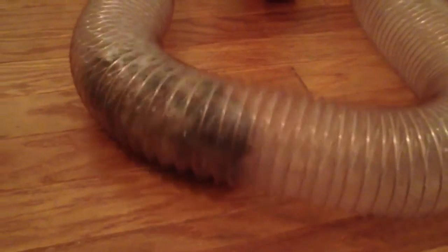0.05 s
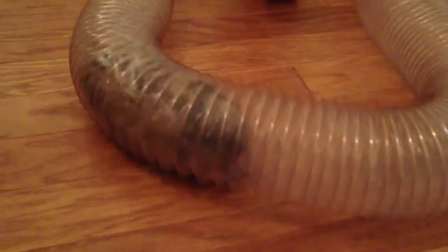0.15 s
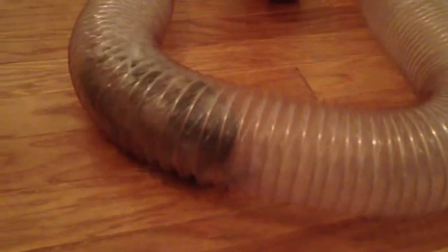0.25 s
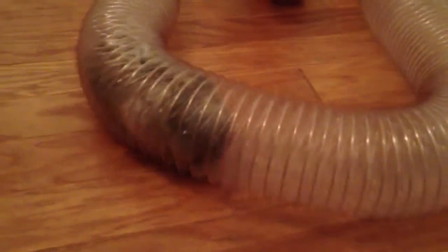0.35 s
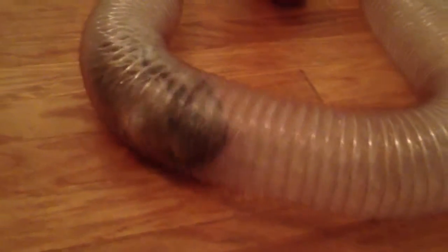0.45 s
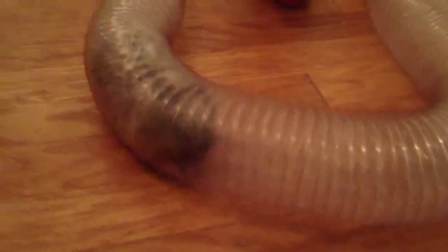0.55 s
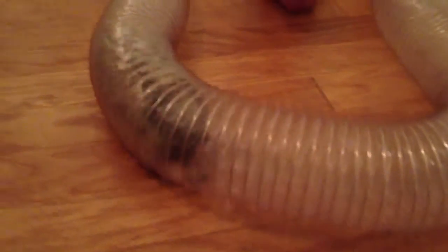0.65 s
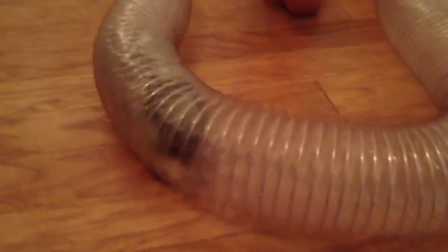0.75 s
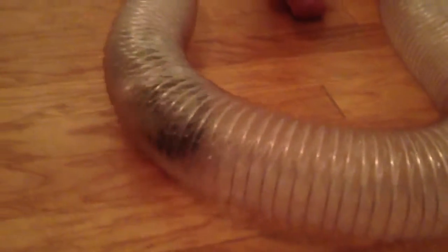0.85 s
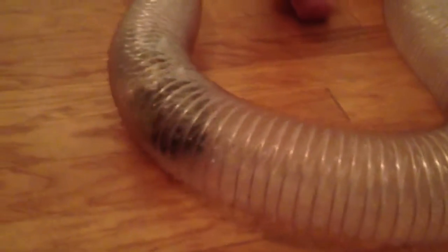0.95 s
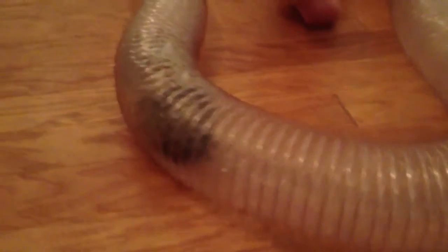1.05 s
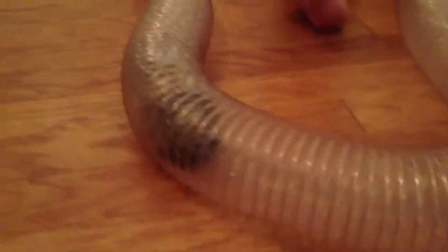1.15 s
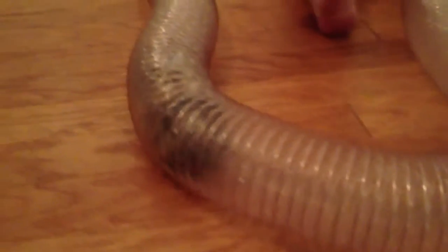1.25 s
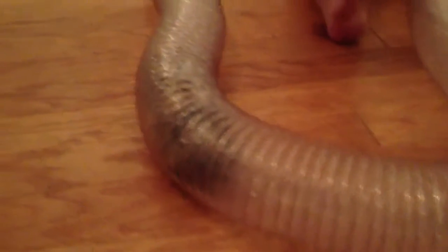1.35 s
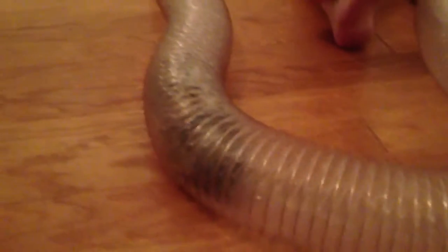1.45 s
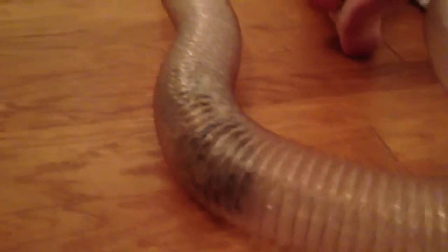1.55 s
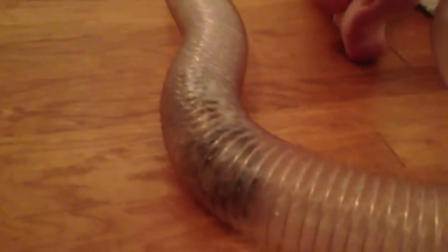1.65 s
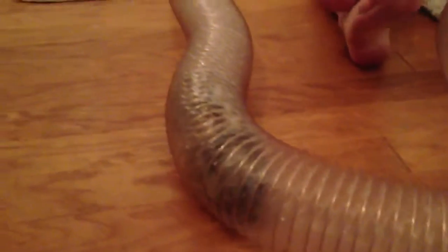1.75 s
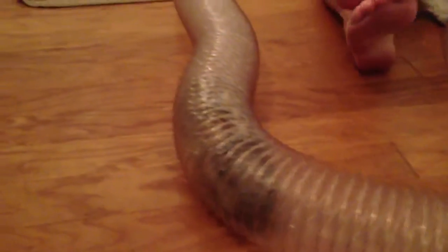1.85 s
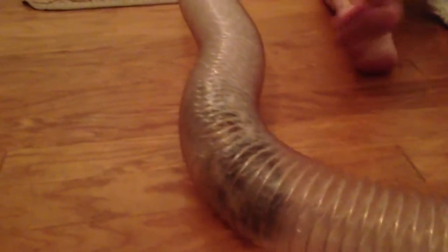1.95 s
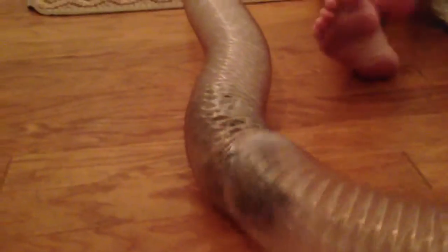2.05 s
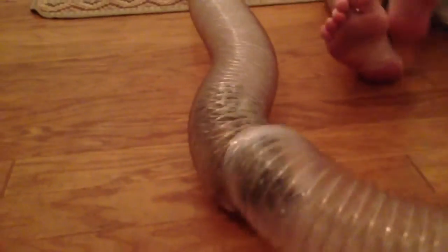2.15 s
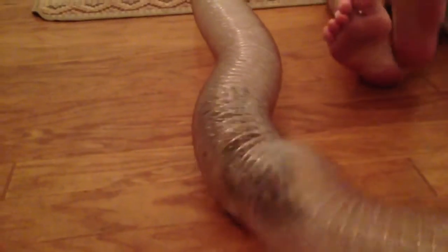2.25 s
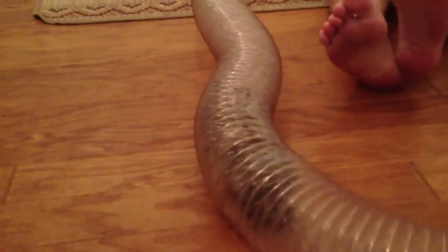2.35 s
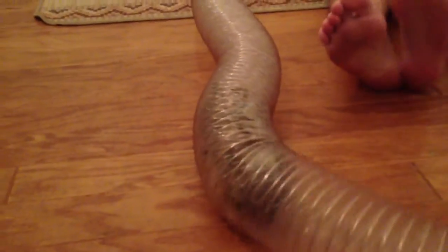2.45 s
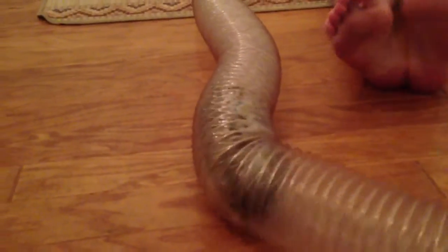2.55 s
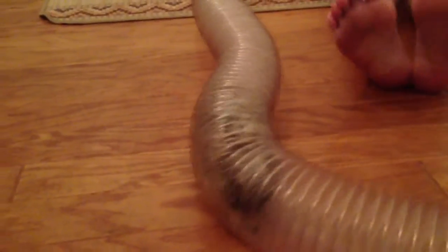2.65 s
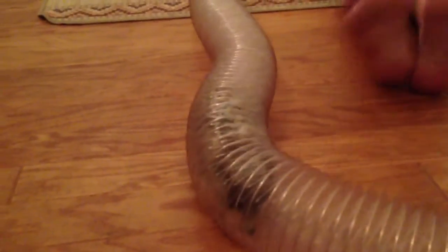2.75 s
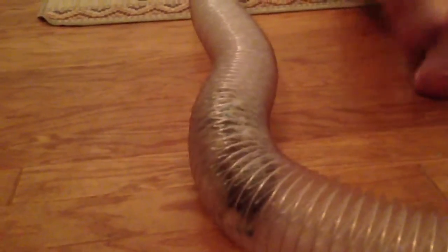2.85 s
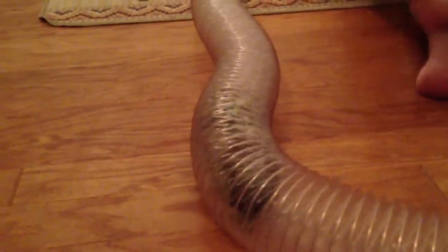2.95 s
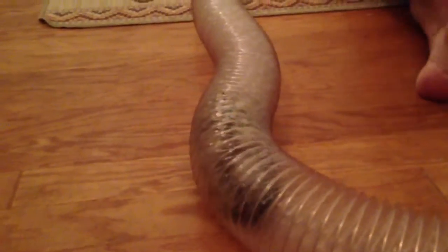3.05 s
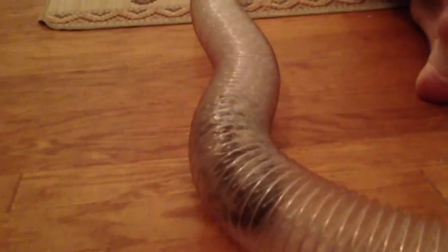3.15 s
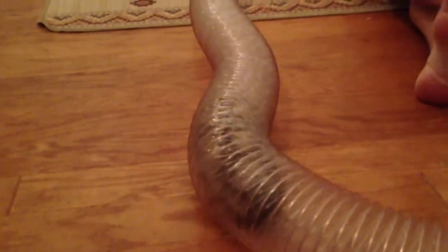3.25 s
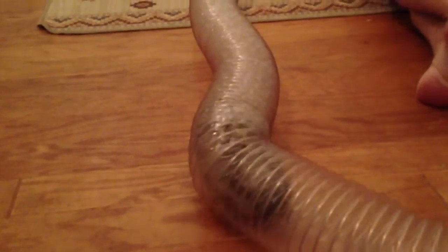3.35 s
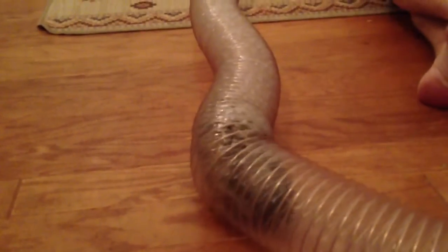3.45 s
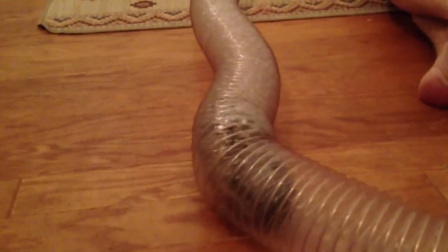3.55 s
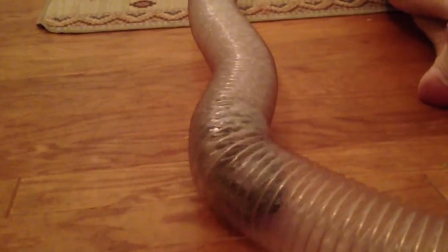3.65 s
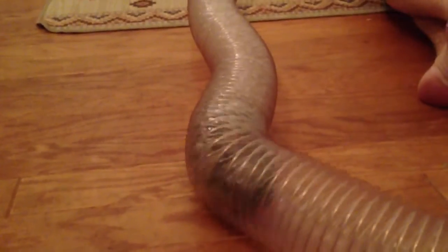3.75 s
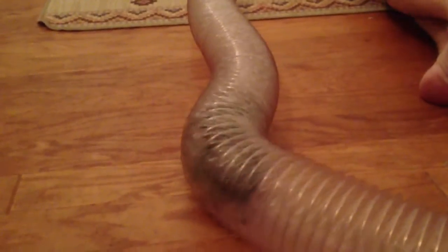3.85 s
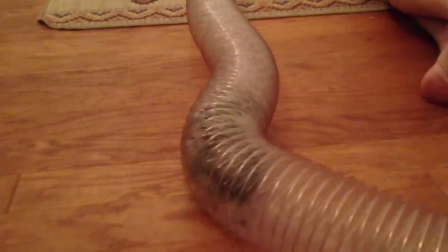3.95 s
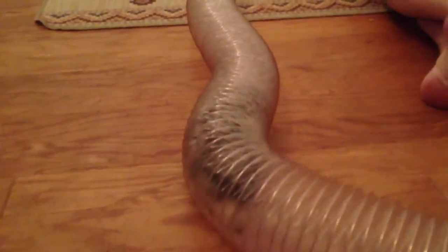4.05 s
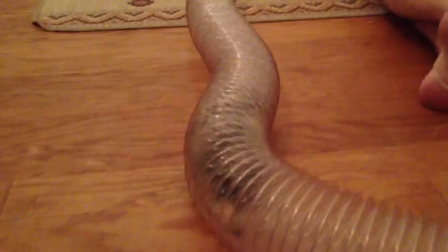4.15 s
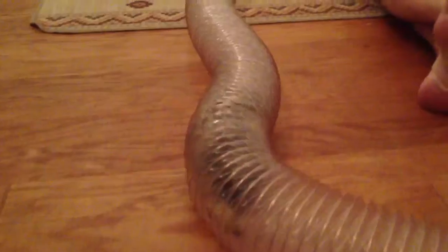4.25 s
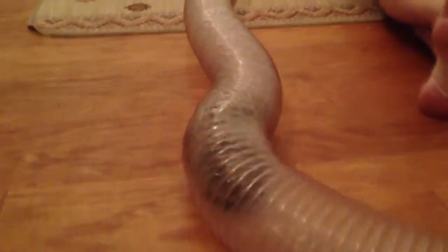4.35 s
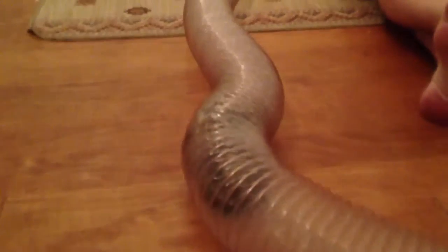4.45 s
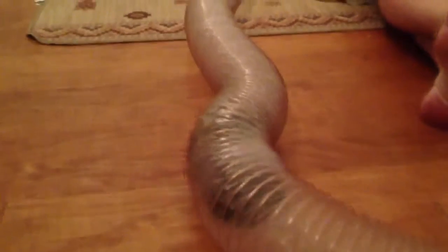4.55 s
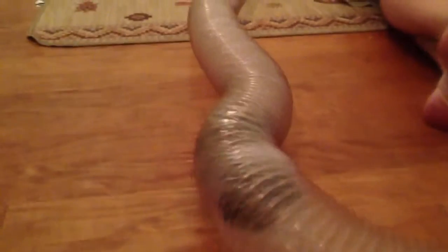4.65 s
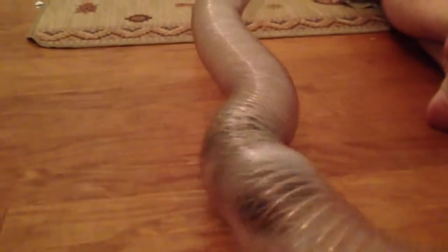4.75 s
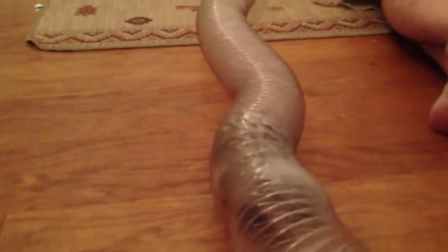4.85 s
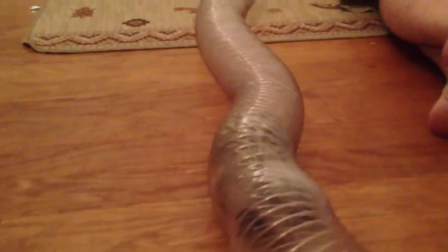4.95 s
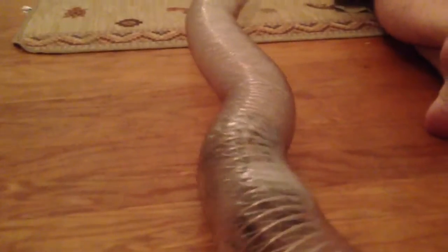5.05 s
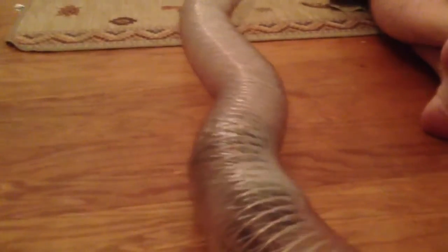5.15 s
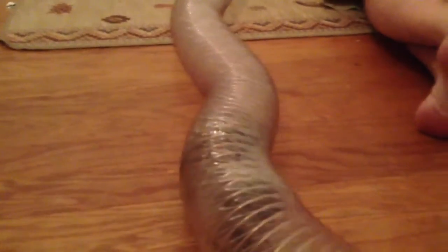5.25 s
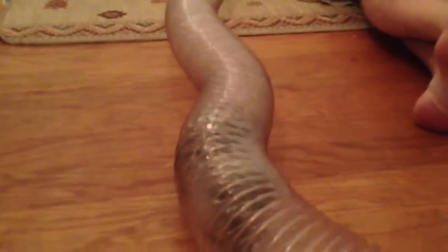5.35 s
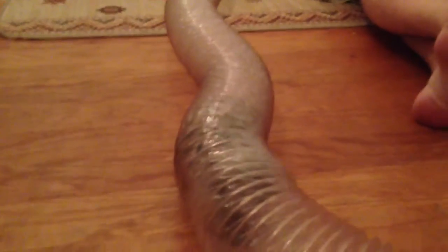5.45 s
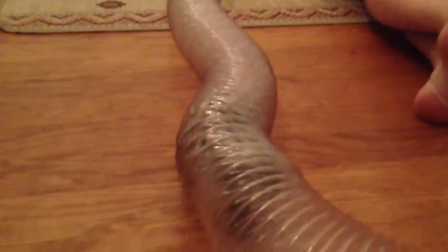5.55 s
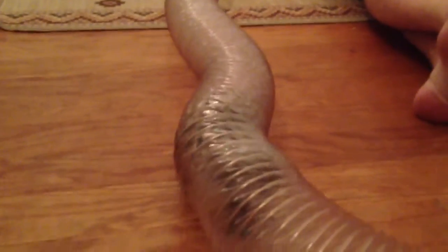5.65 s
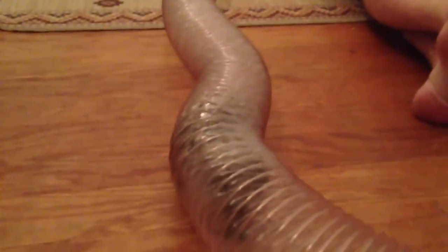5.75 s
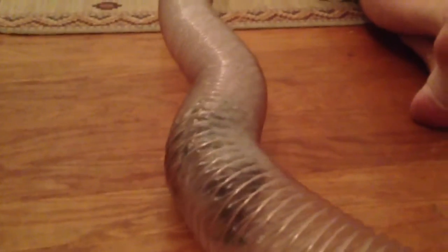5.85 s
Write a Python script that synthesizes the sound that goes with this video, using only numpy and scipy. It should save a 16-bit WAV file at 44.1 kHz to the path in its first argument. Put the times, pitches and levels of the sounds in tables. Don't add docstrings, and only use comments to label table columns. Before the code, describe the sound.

Close, dry plastic clicks, pops and crinkles from claws catching the ribs of a flexible tube. Some are bright and single, some doubled by the floor, some muffled by the animal's body. Fur and nails brush between them, and one short scrape follows a very loud snap late on. The end thins to faint ticks, in a small hard room with about a third of a second of reverberation and low hiss.

```python
import sys
import numpy as np
from scipy import signal
from scipy.fft import rfft, irfft
from scipy.io import wavfile
from scipy.ndimage import uniform_filter1d

SR = 44100
rng = np.random.default_rng(int(sys.argv[2]) if len(sys.argv) > 2 else 0)


def voltage_ratio(level):
    return 10 ** (np.asarray(level, float) / 20)


def dump(signal):
    limited = np.clip(np.atleast_2d(signal).T, -1, 1)
    pcm = np.round(limited * 32767).astype(np.int16)
    wavfile.write(sys.argv[1], SR, pcm)


N = 260609

# t/s, peak level/dB, rib ring f/Hz, hose knock re peak/dB, bright tick re peak/dB
CRACKS = [
    (.593, -27.5, 6950, -33, -14.5),
    (1.26, -22, 4340, -7, -19),
    (2.242, -23, 1520, -19, -2),
    (2.467, -22, 4400, -14, -15.5),
    (2.573, -20, 1500, -7.5, -12.5),
    (3.25, -31.5, 4040, -14.5, -15.5),
    (3.384, -19, 2560, -22.5, -12.5),
    (3.72, -14, 1470, -17.5, -15.5),
    (3.7755, -23, 1900, -7.5, -9),
]
DOUBLES = [
    (0.882, -25, 3350, -23, -30),
    (1.217, -22.5, 3820, -28, -22.5),
    (3.008, -24, 2880, -40, -40),
    (3.513, -23.5, 2550, -19.5, -8),
    (4.559, -20, 1610, -14, -31),
    (4.5715, -13, 2600, -22, -31),
    (4.7206, -20.5, 3700, -12.5, -19.5),
]
MUFFLED = [
    (1.308, -32.5, 2460, -1, -30),
    (2.244, -26.5, 1340, 2, -29),
    (2.552, -29, 2650, 0, -18.5),
    (3.7225, -17, 4800, -20, -20.5),
    (3.813, -23, 1500, -14, -19),
    (4.361, -27.5, 1350, -3.5, -21),
    (4.471, -27.5, 1400, -3, -3.5),
]


def evened(x):
    return x / np.sqrt(np.mean(x ** 2) + 1e-20)


def read(points, hz):
    f, value = np.transpose(points)
    return np.interp(np.log(hz + 1), np.log(f + 1), value)


def add(mix, s, sound):
    part = mix[max(round(s * SR), 0):][:len(sound)]
    part += sound[:len(part)]


def band(x, lo_hz, hi_hz, order=2):
    sos = signal.butter(order, [lo_hz, min(hi_hz, SR / 2.05)], "band", fs=SR, output="sos")
    return signal.sosfilt(sos, x)


def ring(hz, cycles, phase, rise=0.12, size=1200):
    turns = np.arange(size) / SR * hz
    swell = 1 - np.exp(-(turns / rise) ** 2)
    wave = np.sin(2 * np.pi * turns + phase) * voltage_ratio(-60 * turns / cycles) * swell
    return wave / abs(wave).max()


def snap(ring_hz, knock_db, tick_db, top_hz, chance):
    rib = ring(ring_hz, 6.5, chance[0], 0.39)
    rib = rib - 0.6 * ring(ring_hz * (1.4 + 0.3 * chance[1]), 7.0, chance[2], 0.5)
    rib = rib - 0.42 * ring(0.58 * ring_hz, 5.5, chance[1], 0.38)
    knock = ring(780 + 200 * chance[3], 6.7, 6 * chance[4], 0.29)
    tick = ring(4300 + 1500 * chance[2], 1.43, 0, 0.78)
    tick = tick - 0.63 * ring(7000 + 2500 * chance[5], 4.44, 0, 1.0)
    tick = tick + 0.74 * ring(11200 + 2500 * chance[6], 8.2, 0, 0.2)
    whole = 0.51 * rib + voltage_ratio(knock_db + 0.5) * knock + voltage_ratio(tick_db + 11.5) * tick
    return band(whole, 182, top_hz, order=4)


def spread(x, chance):
    hz = np.fft.rfftfreq(len(x), 1 / SR)
    delay_s = 0.0003 * np.sin(hz / 1400 + 6 * chance) ** 2
    return irfft(rfft(x) * np.exp(-2j * np.pi * np.cumsum(delay_s) * hz[1]), len(x))


def near_echoes(x, echo_db, chance, grit):
    # delay t/s, level/dB
    bounces = [(.0026, -9), (.0052, -10), (.009, -13)]
    lag = np.arange(len(grit)) / SR
    paths = grit * voltage_ratio(-23) * np.exp(-((lag - 0.0028) / 0.0012) ** 2)
    for (s, db), u in zip(bounces, chance):
        paths[round(SR * s * (0.85 + 0.3 * u))] += voltage_ratio(db) * np.sign(np.sin(40 * u))
    return signal.fftconvolve(x, np.r_[1, voltage_ratio(echo_db) * paths[1:]])


def hard_snaps():
    near, low, far = (-1.1, -3.5, 14300), (-1.1, 1.3, 11400), (-1.9, -0.38, 8400)
    places = (CRACKS, near), (DOUBLES, low), (MUFFLED, far)
    return [(*row, *path) for table, path in places for row in table]


def small_snaps():
    # t/s, peak level/dB, rib ring f/Hz, room share/dB
    knocks = [(.229, -52.5, 1880, 13), (.303, -39.5, 2770, 4.5), (.49, -47, 2100, -7),
              (1.107, -42.5, 1880, 4), (1.133, -37.5, 1420, -20), (1.199, -47.5, 3650, 9),
              (1.242, -40, 3520, 4), (1.462, -44.5, 1400, -1), (1.817, -50, 2220, 10),
              (1.832, -53, 2220, 1), (1.961, -45, 2040, -3), (2.096, -47.5, 1540, 4),
              (2.122, -53.5, 1880, 16.5), (2.2375, -23, 2170, 6), (2.256, -24.5, 1850, 1),
              (4.153, -42, 2800, 3), (4.348, -39, 1340, 7), (4.382, -43, 1110, 0), (4.536, -36, 2300, 4.5),
              (4.774, -40, 1240, 3), (5.008, -48.5, 2490, 7), (5.433, -50, 1610, 2), (4.373, -47, 1200, -3),
              (4.405, -36, 1520, 3), (2.557, -31.5, 800, -2), (2.594, -35, 810, 2), (1.275, -46, 1200, -9),
              (1.325, -45, 1200, -4), (3.736, -34, 1700, -2)]
    ticks = [(.04, -47, 1630, -5), (.066, -43, 3220, -3), (.0762, -32, 4240, -4), (.366, -36.5, 4500, -18),
             (.401, -38.5, 1880, -2), (.574, -43, 4000, -6), (.619, -32.5, 5800, 3.5), (.685, -42, 1890, 0),
             (.842, -34, 1370, -3), (1.456, -59, 1380, -5), (2.479, -31.5, 2460, -11),
             (2.638, -31.5, 7050, -12), (3.018, -38.5, 4940, 4), (3.29, -41, 4000, -6),
             (3.536, -26, 2570, 3), (3.654, -40, 2520, 3), (4.17, -36, 2870, -18), (4.348, -39, 4450, 2),
             (4.395, -32, 1430, -1), (5.032, -48, 1600, 12), (5.0555, -39, 2510, 5.5),
             (5.1185, -39, 1900, -1), (5.125, -42.5, 3600, 5.5), (5.323, -55, 3620, -11),
             (5.354, -45, 5900, -11), (5.426, -70, 4780, -11), (5.5445, -37.5, 1860, 1),
             (3.601, -42, 2500, -2), (4.544, -44, 5500, 0), (4.366, -40, 6040, 0), (.229, -47, 1770, -5),
             (.303, -44, 2730, -3), (.63, -42, 4000, -3)]
    flicks = [(.052, -34, 4260, -11), (.144, -39, 2020, 1), (.164, -42, 3500, -6), (.335, -32.5, 2730, 2.5),
              (.536, -37, 3500, 8), (.557, -37, 1900, -1), (.717, -40, 2660, 10), (.796, -27, 2840, -8),
              (.864, -35, 3220, -14), (2.388, -36, 4040, 4), (2.52, -30.5, 2380, -4), (2.73, -43, 3700, 2),
              (3.025, -26.5, 3130, -5), (3.275, -28, 2850, 1), (3.555, -27.5, 1400, -3),
              (3.715, -38, 4200, -1), (3.857, -34, 6000, 2), (3.944, -38.5, 2720, -1),
              (4.029, -41.5, 2570, 2), (4.218, -27.5, 3940, -1), (4.23, -29.5, 2970, -4),
              (4.266, -34, 2450, -12), (4.285, -40.5, 1400, -1), (5.708, -35, 3580, -5),
              (4.3335, -32.5, 3970, 3), (4.69, -33, 2650, 0), (4.672, -40, 2500, -5),
              (3.568, -34, 1650, -4), (2.47, -29, 1500, -6), (3.692, -45, 1700, 3)]
    pops = [(.842, -50, 1900, 9), (2.419, -26, 3540, -5), (3.007, -34, 1390, 4.5), (3.724, -13, 11200, 6.5),
            (4.228, -26, 3230, -9), (4.472, -20, 6800, -9), (4.56, -20.5, 3500, -7),
            (4.587, -20, 2600, -10), (4.599, -28, 2400, -8), (4.681, -20.5, 2460, -3.5),
            (5.472, -31, 2900, 1), (5.625, -30, 1900, 1), (3.385, -21, 5800, -6), (3.5135, -26, 4000, 8.5),
            (3.563, -30, 12000, -8), (4.612, -29, 2500, -10), (4.618, -37, 2600, -10),
            (4.628, -33, 2500, -10), (4.59, -27, 3800, 1), (3.776, -28, 8500, 2), (1.262, -27, 2400, -1.5),
            (3.7205, -23, 3600, -6), (2.574, -28, 820, 1), (2.244, -26, 1530, 1.5), (4.575, -22, 2560, -7),
            (.5895, -35, 4700, -3)]
    nicks = [(.0675, -40, 5500, -8), (.087, -45, 6000, -8), (.104, -45, 5000, -8), (.168, -46, 4500, -8),
             (.2304, -42, 7100, -8), (.241, -40, 8500, -8), (.2575, -41, 7500, -8), (.284, -46, 6000, -8),
             (.349, -40, 3500, -6), (.481, -47, 8000, -8), (.506, -47, 4800, -8), (.608, -41, 6000, -8),
             (.685, -42, 4500, -6), (.712, -40, 4500, -3), (.832, -42, 6000, -4), (.855, -44, 5000, -6),
             (3.0235, -42, 6000, -6), (3.2745, -33, 5000, 1), (3.289, -44, 5500, -6),
             (3.588, -40, 9000, -8), (3.835, -32, 4000, -4), (5.02, -44, 2500, 0), (5.057, -41, 5000, -4),
             (5.176, -53, 3000, -6), (5.4725, -42.5, 4600, 2), (5.5468, -41, 5000, -3),
             (5.151, -48, 1100, -3), (2.5745, -22, 2500, 1), (3.386, -26.5, 3920, 2.5),
             (3.009, -33, 4470, 1)]
    # hose knock re peak/dB, bright tick re peak/dB
    kinds = ((knocks, (-5.5, -17)), (ticks, (-24.5, -11)), (flicks, (-20, -21)),
             (pops, (-20.5, -29)), (nicks, (-29, -17)))
    echo_db, top_hz = -2.2, 11000
    return [(s, db, hz, *colour, room_db, echo_db, top_hz)
            for table, colour in kinds for s, db, hz, room_db in table]


def claws():
    dry, sends = np.zeros(N), np.zeros((3, N))
    rows = hard_snaps() + small_snaps()
    chance, grit = rng.random((len(rows), 12)), rng.laplace(size=(len(rows), 900))
    for k, (s, db, hz, knock_db, tick_db, room_db, echo_db, top_hz) in enumerate(rows):
        sound = voltage_ratio(db) * spread(snap(hz, knock_db, tick_db, top_hz, chance[k]), chance[k, 11])
        add(dry, s + 0.0006, near_echoes(sound, echo_db, chance[k, 7:], grit[k]))
        dulled = signal.lfilter([0.62], [1, -0.4], sound)
        add(sends[k % 3], s, voltage_ratio(room_db - 1.5) * dulled)
    return dry + spots(sends)


def thumps():
    # t/s, peak level/dB, ring f/Hz, t60/s
    paws = [(0.235, -56, 310, 0.075), (0.466, -60, 334, 0.14), (0.548, -46, 330, 0.02),
            (0.719, -52.5, 493, 0.086), (1.129, -58, 340, 0.046), (1.215, -49.5, 370, 0.04),
            (1.466, -51.5, 490, 0.03), (2.088, -53, 340, 0.031), (2.142, -45.5, 358, 0.027),
            (2.238, -26, 420, 0.0096), (2.464, -51, 412, 0.061), (2.554, -46, 330, 0.066),
            (2.648, -42, 360, 0.018), (3.008, -57, 316, 0.087), (3.247, -60.5, 342, 0.083),
            (3.376, -60, 310, 0.041), (3.512, -43, 480, 0.05), (3.718, -43, 491, 0.057),
            (3.772, -43, 346, 0.053), (4.151, -49, 340, 0.021), (4.288, -49.5, 476, 0.062),
            (3.792, -50, 358, 0.02), (4.362, -41, 335, 0.13), (4.385, -50, 410, 0.026),
            (4.405, -51, 342, .05), (4.467, -46, 537, 0.054), (4.566, -40.5, 525, 0.031),
            (4.568, -44, 329, 0.077), (4.605, -45, 340, 0.029), (4.7475, -37.5, 348, 0.045),
            (4.79, -48, 430, 0.028), (4.923, -49.5, 507, 0.01), (5.469, -50.5, 410, 0.014),
            (5.552, -56, 340, 0.023)]
    dry, sends = np.zeros(N), np.zeros((3, N))
    for k, (s, db, hz, t60) in enumerate(paws):
        sound = voltage_ratio(db) * ring(hz, max(t60 * hz, 3), 0, 0.24, size=9000)
        add(dry, s, sound)
        add(sends[k % 3], s, voltage_ratio(1.0) * sound)
    return dry + spots(sends)


def booms():
    # t/s, peak level/dB, ring f/Hz, t60/s, rise/s
    boards = [
        (0.07, -66, 179, 0.14, 0.022),
        (2.246, -37.5, 150.4, 0.35, 0.0066),
        (2.75, -65.5, 132, 0.25, 0.016),
        (3.076, -52.5, 480, 0.059, 0.0026),
        (4.774, -39.5, 490, 0.053, 0.00053),
        (3.531, -49, 190, 0.086, 0.0018),
        (4.749, -60, 146, 0.17, 0.018),
        (5.302, -71, 114.4, 0.58, 0.055),
        (5.44, -64, 141, .3, 0.044),
    ]
    out = np.zeros(N)
    for s, db, hz, t60, rise in boards:
        pair = ring(hz, t60 * hz, 0, rise * hz, size=SR // 2)
        pair = pair + 0.49 * ring(1.6 * hz, t60 * hz, 0, rise * hz, size=SR // 2)
        add(out, s, voltage_ratio(db) * pair)
    return out


def rattle():
    ticks_per_s, level_db, fade_db_per_s = 89, -25, 172
    kicks = np.zeros(N)
    for s, db, *_ in CRACKS + DOUBLES + MUFFLED:
        add(kicks, s, np.atleast_1d(voltage_ratio(db + level_db)))
    shake = signal.lfilter([1], [1, -voltage_ratio(-fade_db_per_s / SR)], kicks)
    draw, size, spot = rng.random((N, 3)).T
    train = shake * (draw < ticks_per_s / SR) * voltage_ratio(7.5 * size)
    pitches_hz = 1280, 2300, 3700, 6800
    which = (spot * len(pitches_hz)) // 1
    out = np.zeros(N)
    for k, hz in enumerate(pitches_hz):
        tick = ring(hz, 7.0, 0, 0.8, size=300)
        out += signal.oaconvolve(train * (which == k), tick)[:N]
    return out


def scrape():
    # t/s, level/dB, wall resonance f/Hz
    slide = [
        (4.575, -34, 2530),
        (4.6, -40, 2250),
        (4.642, -47, 2300),
        (4.69, -45, 2430),
        (4.725, -47.5, 1900),
    ]
    s, db, hz = np.transpose(slide)
    t = np.arange(s[0], s[-1], 1 / SR)
    slips = rng.laplace(size=len(t)) * (rng.random(len(t)) < 500 / SR)
    slips = slips + 0.08 * rng.standard_normal(len(t))
    turn = np.exp(2j * np.pi * np.cumsum(np.interp(t, s, hz)) / SR)
    r = np.exp(-np.pi * 900 / SR)
    tone = (turn * signal.lfilter([1], np.convolve([1, -r], [1, -r]), slips / turn)).real
    out = np.zeros(N)
    add(out, s[0], voltage_ratio(np.interp(t, s, db)) * evened(tone) * signal.windows.tukey(len(t), 0.15))
    return 0.82 * out + 0.38 * room(out)


def strokes():
    brushes = [(0., 0.1, -53.5, -0.039), (0.24, 0.018, -57, 1), (0.318, 0.032, -50, -0.78),
               (0.542, 0.18, -52.5, 0.25), (0.768, 0.017, -51.5, -1.27), (0.83, 0.041, -48.5, 0.14),
               (1.13, 0.043, -56, 0.046), (1.28, 0.03, -59.5, -1.6), (1.458, 0.033, -64.5, -1.2),
               (1.84, 0.027, -62, -0.19), (1.963, 0.029, -63, 1), (2.04, .05, -60.5, -1.3),
               (2.168, 0.056, -55.5, 0.93), (2.23, 0.0082, -50.5, -0.98), (2.444, 0.043, -49, -0.64),
               (2.559, 0.074, -46.5, 0.34), (2.814, 0.2, -57, 0.91), (3.042, 0.031, -55, -0.92),
               (3.29, .1, -52.5, -0.28), (3.56, 0.028, -55, 1), (3.752, 0.091, -46, 0.27),
               (4.118, 0.69, -53, -0.2), (4.512, 0.091, -52.5, -0.97), (4.692, 0.037, -63, 0.8),
               (4.775, 0.058, -56.5, 0.29), (5.44, 0.1, -68, 1), (5.542, 0.057, -56.5, -0.84),
               (5.734, 0.013, -62.5, -0.5)]
    swell_db_per_s, fade_db_per_s = 146, 133
    rest = (0, N / SR, -67.5, 0.0051)
    s, hold, effort_db, speed = np.transpose(brushes + [rest])[..., None]
    t = np.arange(0, N, 64) / SR
    level_db = effort_db - swell_db_per_s * np.maximum(s - t, 0)
    level_db = level_db - fade_db_per_s * np.maximum(t - s - abs(hold), 0)
    shares_db = 0, -5 - 5 * speed, -9.5 + 11.5 * speed
    gains = [np.linalg.norm(voltage_ratio(level_db + db), axis=0) for db in shares_db]
    return [np.interp(np.arange(N) / SR, t, gain) for gain in gains]


def rasp():
    # f/Hz, half width/Hz, level/dB
    modes = [(722, 38, 19), (1400, 360, 10), (1880, 220, -5), (2380, 90, 2), (2760, 37, -1.5),
             (3670, 64, -20), (4160, 120, -13)]
    scratch_gain, drag_gain, fizz_gain = strokes()
    wander = evened(uniform_filter1d(rng.standard_normal(N), 500))
    clumps = voltage_ratio(4 * np.clip(wander, -2, 1.8))
    slips = voltage_ratio(3.5 * np.minimum(rng.exponential(1, N), 3.5)) * (rng.random(N) < 900 / SR)
    slips = slips * rng.choice([-1, 1], N)
    ticks = voltage_ratio(3 * np.minimum(rng.exponential(1, N), 2)) * (rng.random(N) < 110 / SR)
    ticks = ticks - 0.24 * np.roll(ticks, 112)
    slips = evened(slips * clumps) + 0.91 * rng.standard_normal(N)
    nails = slips + 0.5 * evened(ticks)
    wall = np.zeros(N)
    for hz, width, db in modes:
        wall += voltage_ratio(db) * band(nails, hz - width, hz + width, order=1) * np.sqrt(hz / width)
    scratch = evened(band(0.55 * evened(wall) + nails, 764, 5740))
    drag = evened(band(slips, 154, 996) + 0.5 * band(slips, 304, 383))
    fizz = evened(band(nails, 2400, 13000))
    dry = scratch_gain * scratch + drag_gain * drag + fizz_gain * fizz
    return 0.44 * dry + 0.41 * room(dry)


def room(x):
    # f/Hz, t60/s
    decay = [(120, 0.38), (330, 0.28), (870, 0.3), (2300, 0.35), (6000, 0.31), (14000, 0.2)]
    size = SR * 3 // 4
    taps = np.zeros(size)
    at = np.arange(260, size - 12, 12)
    taps[at + rng.integers(0, 12, len(at))] = rng.choice([-1.0, 1.0], len(at))
    hz, t, z = signal.stft(taps, SR, nperseg=256)
    tail = signal.istft(z * voltage_ratio(-60 * t / read(decay, hz)[:, None]), SR, nperseg=256)[1]
    tail = tail * (1 - np.exp(-np.arange(len(tail)) / (SR * 0.0057)))
    return signal.fftconvolve(x, tail / np.linalg.norm(tail))[:N]


def spots(sends):
    out = np.zeros(N)
    for send in sends:
        tail = room(np.eye(1, SR)[0])[:SR]
        out += signal.fftconvolve(send, tail)[:N]
    return out


def hiss():
    # f/Hz, level per Hz/dB
    colour = [(25, -3), (80, -34), (140, -5), (240, -10), (400, -7.5), (600, -11), (900, -15), (1560, -23),
              (3000, -19), (6000, -19.5), (15300, -23)]
    frames, hz = N // 256 + 5, np.fft.rfftfreq(1024, 1 / SR)
    a, b, patches = rng.standard_normal((frames, 513, 3)).T
    patches = evened(uniform_filter1d(uniform_filter1d(patches, 12, 0), 14, 1))
    z = (a + 1j * b) * voltage_ratio(read(colour, hz)[:, None] + 0.45 * patches)
    return voltage_ratio(-65.5) * evened(signal.istft(z, nperseg=1024, noverlap=768)[1][:N])


def scene():
    return (claws() + thumps() + booms() + rattle() + scrape() + rasp() + hiss())[None]


def roll_off(x):
    return signal.sosfilt(signal.butter(12, 16490, fs=SR, output="sos"), x)


def record(dry):
    shelf_hz, edge_hz, gate_db, top_db = 15400, 16500, -88, -24
    thin = signal.sosfilt(signal.butter(3, 95, "high", fs=SR, output="sos"), dry)
    thin = thin + voltage_ratio(-19) * band(dry, 15, 40, order=1)
    low, edge = (signal.firwin(401, hz, window=("kaiser", 9), fs=SR) for hz in (shelf_hz, edge_hz))
    top = signal.oaconvolve(thin, (edge - low)[None], "same")
    power = uniform_filter1d(top ** 2, size=512)
    opening = power / (power + voltage_ratio(2 * gate_db) * 10)
    shelved = signal.oaconvolve(thin, low[None], "same") + voltage_ratio(top_db) * top * 1.6 * opening
    return roll_off(shelved)


dry = scene()
out = record(dry)
dump(out)
```